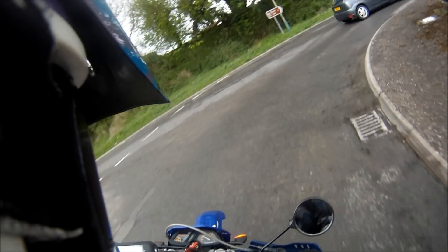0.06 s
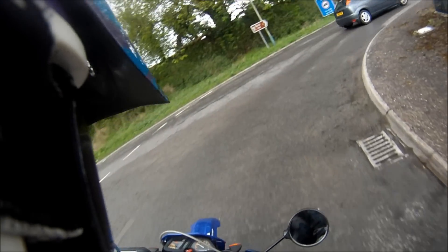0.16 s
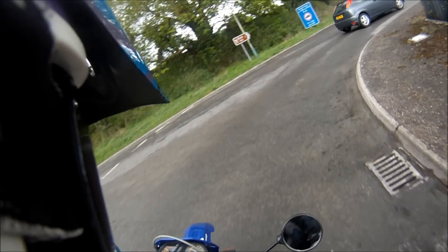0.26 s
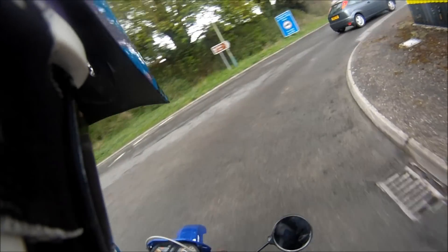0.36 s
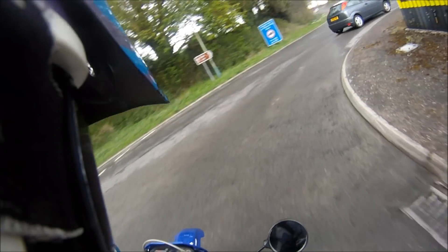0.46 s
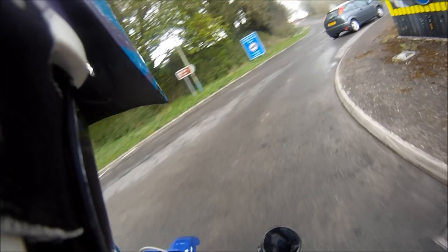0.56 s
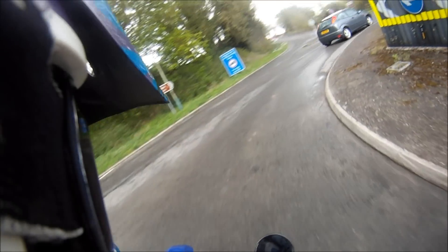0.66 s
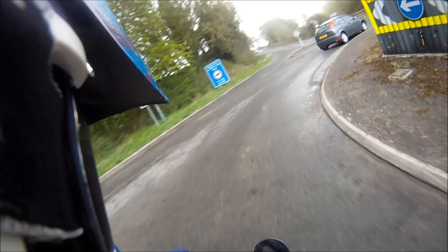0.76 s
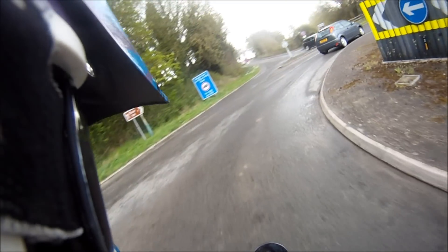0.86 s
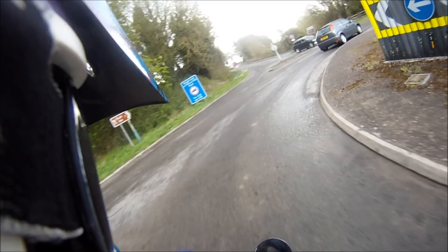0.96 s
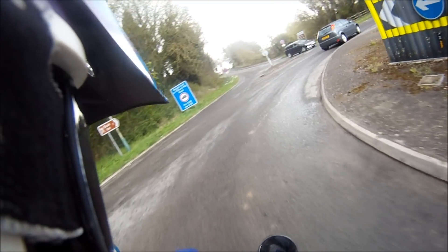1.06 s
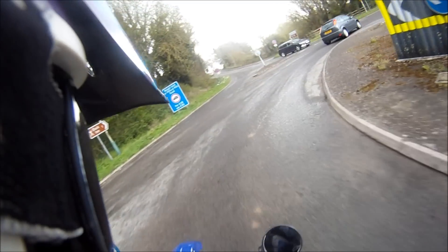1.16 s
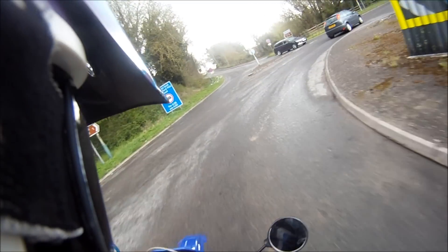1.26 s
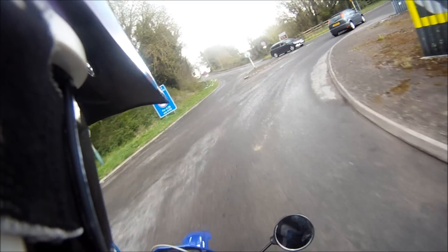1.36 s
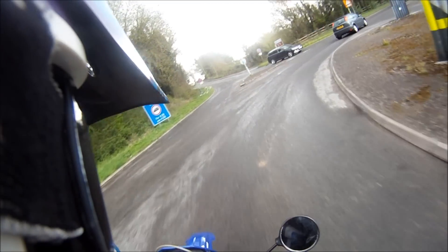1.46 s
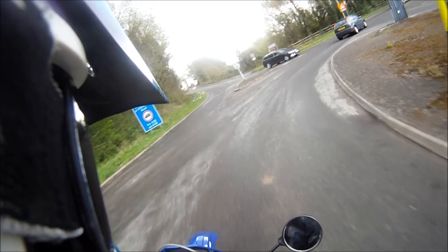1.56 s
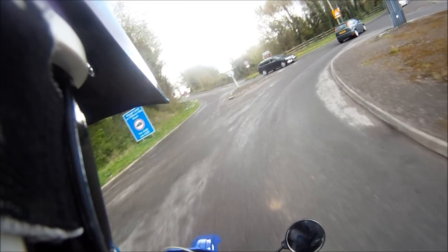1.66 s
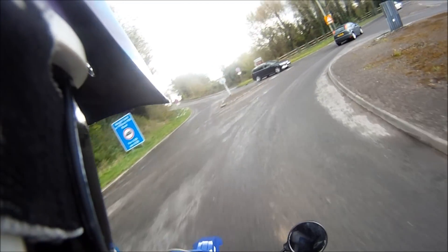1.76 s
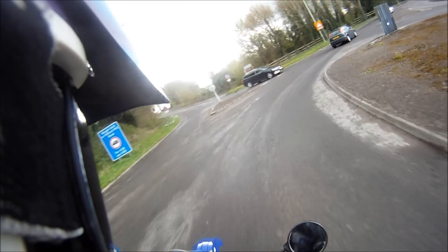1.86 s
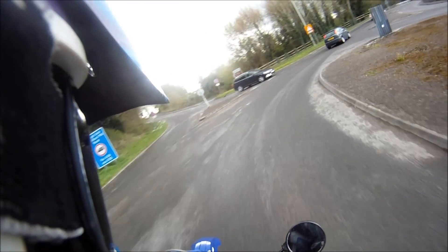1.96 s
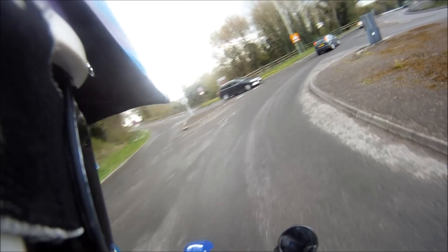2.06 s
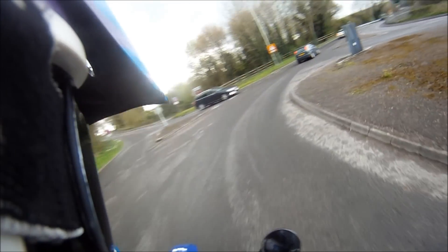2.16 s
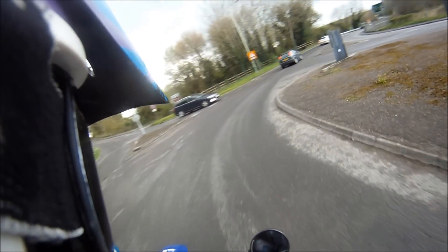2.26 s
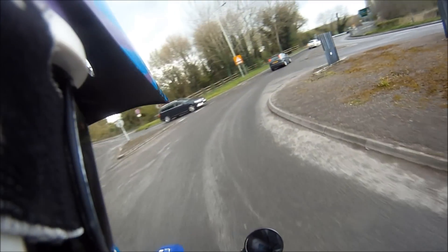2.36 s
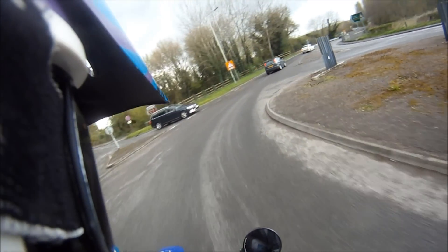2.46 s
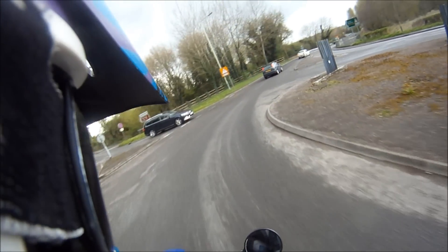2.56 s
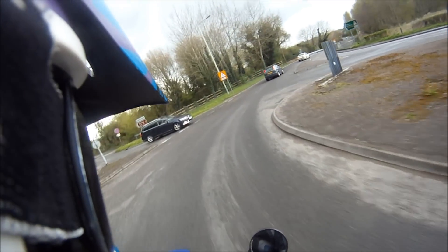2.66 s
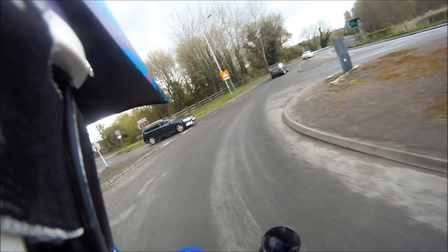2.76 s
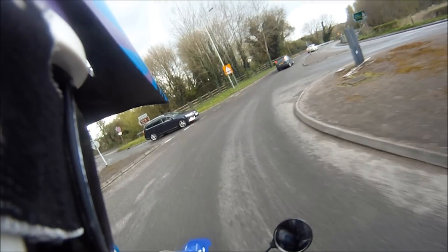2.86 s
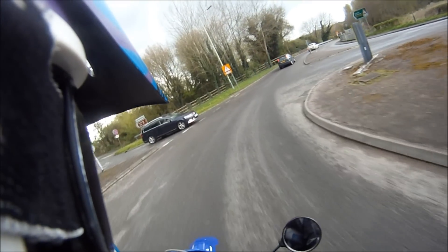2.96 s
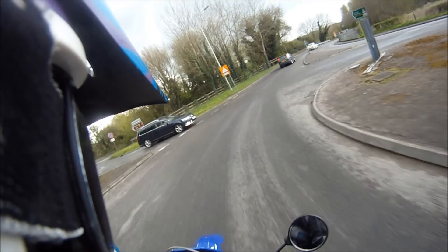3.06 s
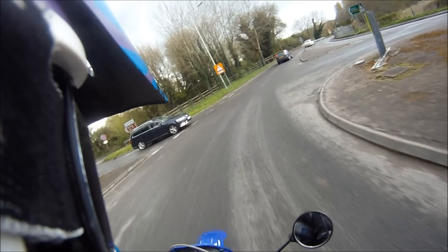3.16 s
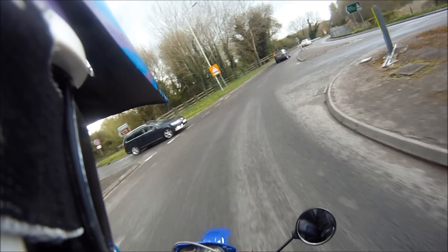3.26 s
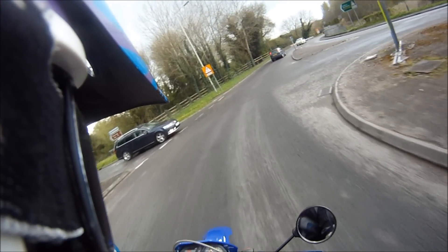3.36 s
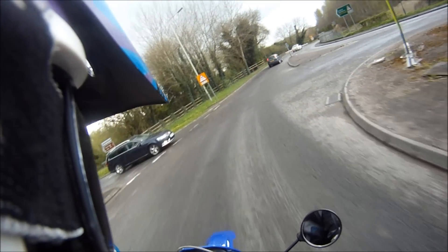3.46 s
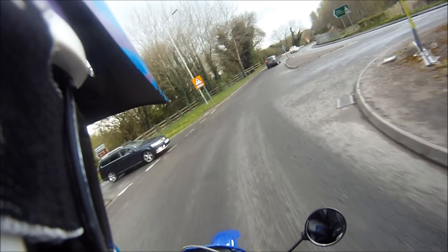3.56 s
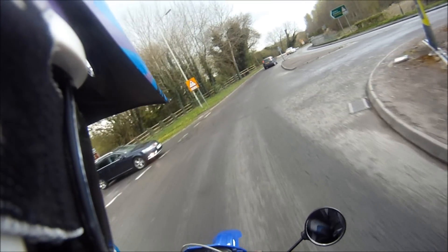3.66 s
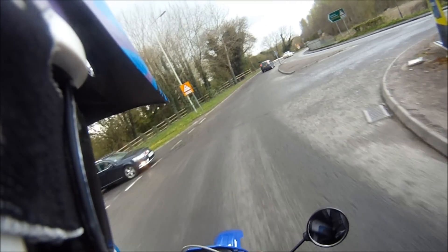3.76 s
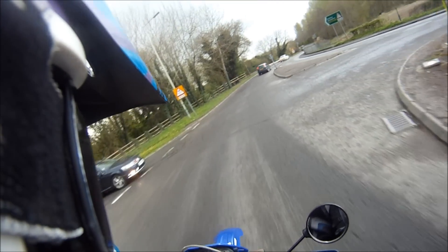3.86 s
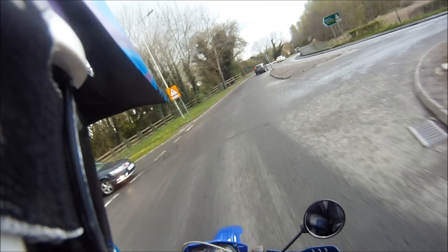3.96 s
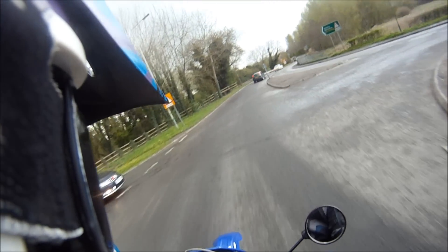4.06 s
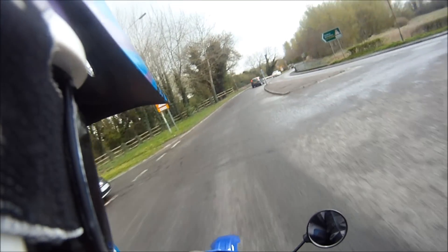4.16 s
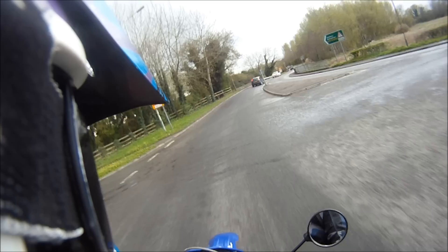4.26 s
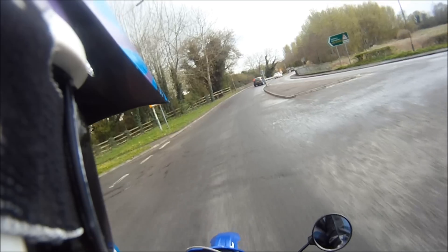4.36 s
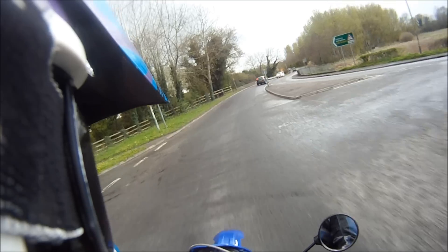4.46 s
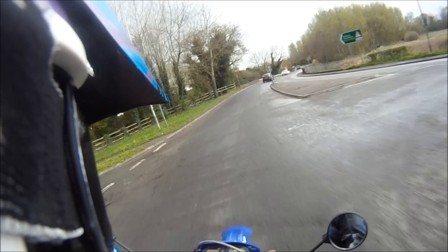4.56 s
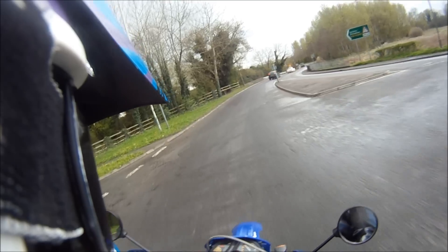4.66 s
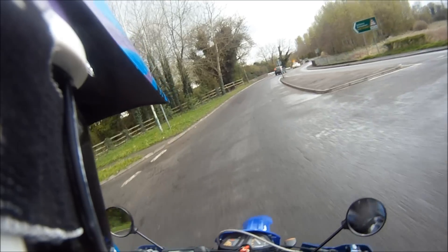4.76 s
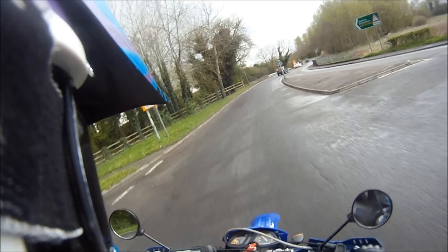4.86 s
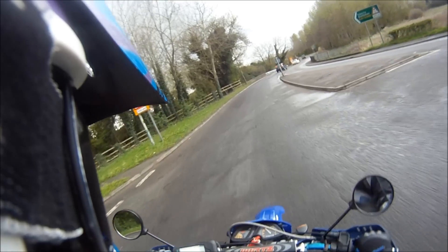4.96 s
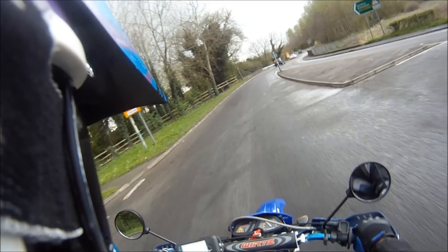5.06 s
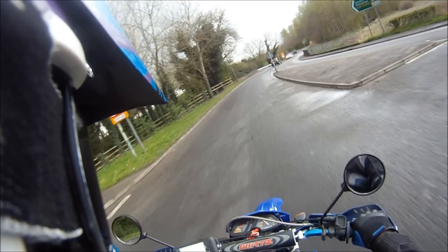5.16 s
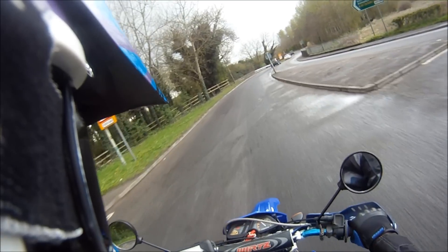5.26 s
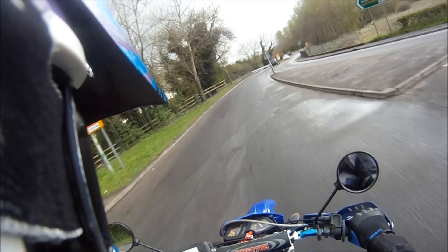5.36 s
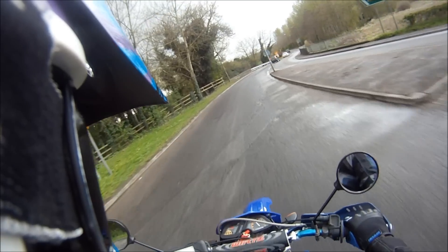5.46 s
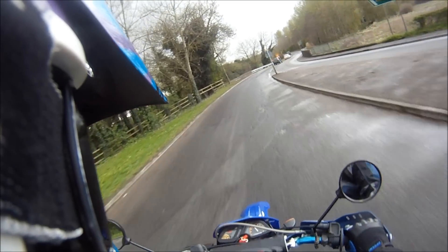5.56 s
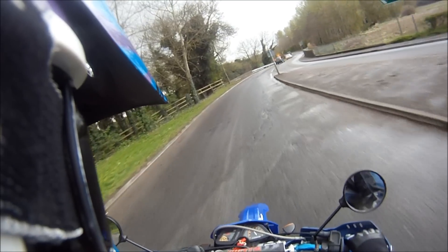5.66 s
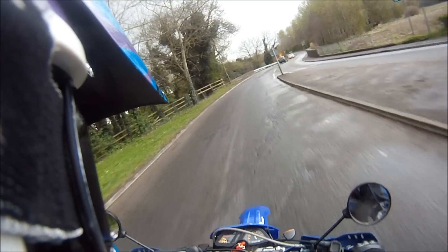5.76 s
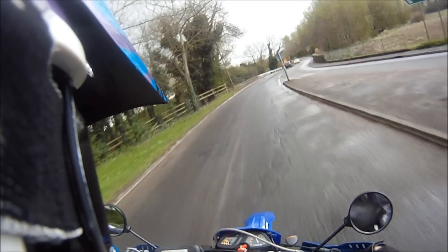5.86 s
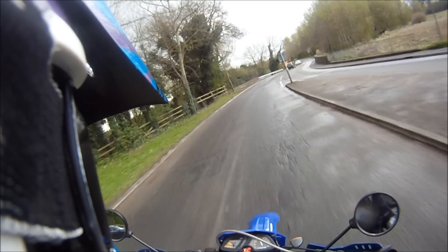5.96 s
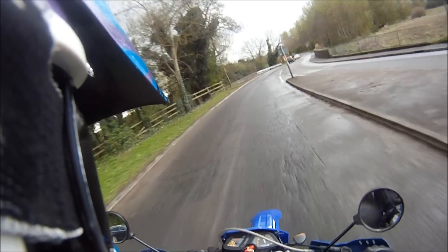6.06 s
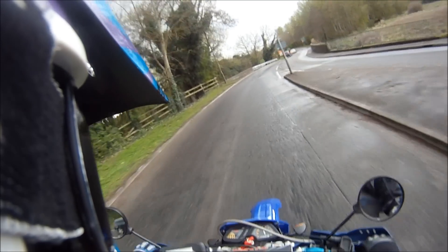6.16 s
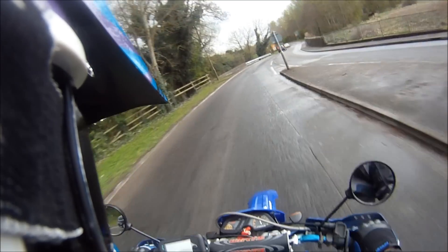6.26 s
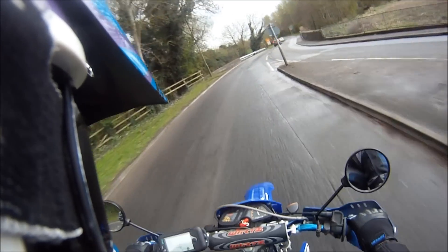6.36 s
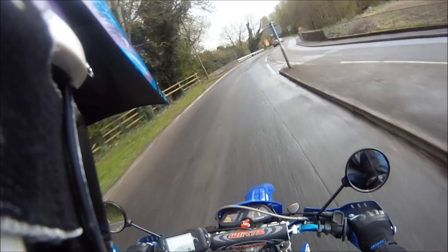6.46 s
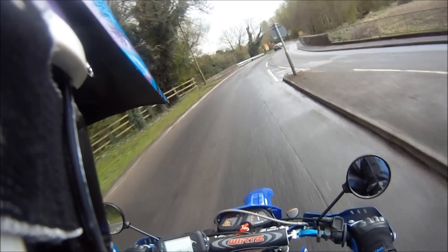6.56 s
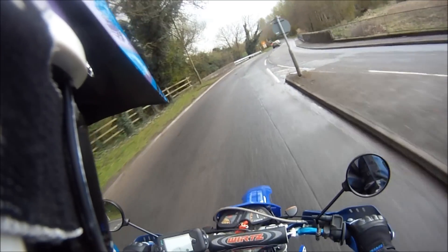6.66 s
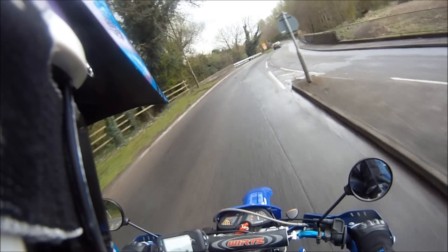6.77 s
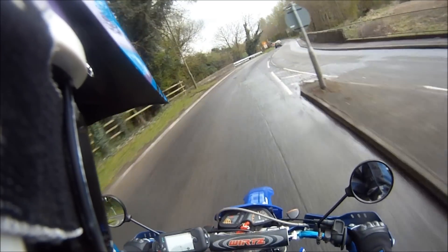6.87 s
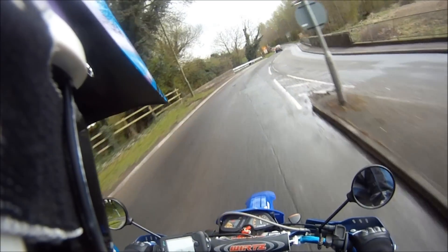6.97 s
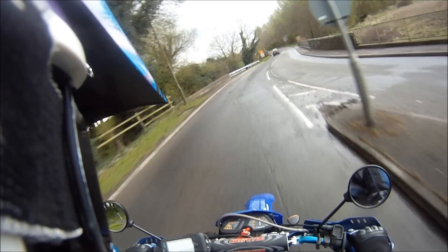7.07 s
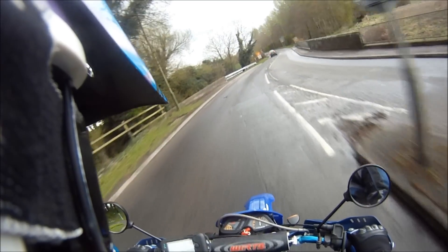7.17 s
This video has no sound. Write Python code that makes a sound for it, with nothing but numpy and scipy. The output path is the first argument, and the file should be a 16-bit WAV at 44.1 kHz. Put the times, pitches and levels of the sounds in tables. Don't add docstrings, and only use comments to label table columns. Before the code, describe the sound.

A small two-stroke motorcycle is heard from a sealed camera on the rider's helmet, close, boxy and gritty, with harsh false treble. From 0 to 2 s the engine holds a hoarse, nasal buzz of about 80 pulses a second, wavering slightly, with deep wind gusts and a thin gear whine. From about 2 s the pitch climbs, roughly 100 by 3.4 s, with small snatches in the drive. A soft thump falls near 4.2 s. After 4.7 s it climbs faster, growing brighter and louder, with a harder jolt at 5.3 s, peaking near 165 at 6 s. The throttle shuts for a quarter second: the buzz weakens, roughens and falls. At about 6.25 s it bites again with a rattle and low thud, juddering around 123, then rises to 140 by the end at about 7.2 s amid stronger wind buffeting.

```python
import sys
import numpy as np
from scipy import signal
from scipy.io import wavfile
from scipy.ndimage import uniform_filter1d

SR = 44100
rng = np.random.default_rng(int(sys.argv[2]) if len(sys.argv) > 2 else 0)


def how_loud(loudness_db):
    steps = np.asarray(loudness_db, float) / 20
    return 10 ** steps


def generate_wav(signal):
    frames = np.transpose(np.atleast_2d(signal))
    scaled = np.clip(frames, -1, 1) * 32767
    pcm = np.round(scaled).astype(np.int16)
    wavfile.write(sys.argv[1], SR, pcm)


N = 318843

SHUT_S, OPEN_S, WRIST_S = 6.005, 6.25, 0.017


def in_time(rows):
    s, *columns = np.transpose(rows)
    return [np.interp(np.arange(N) / SR, s, column) for column in columns]


def by_pitch(points, hz):
    table_hz, level_db = np.transpose(points)
    return np.interp(np.log(hz), np.log(table_hz), level_db)


def between(start_s, end_s, ramp_s):
    t = np.arange(N) / SR
    return np.clip(np.minimum(t - start_s, end_s - t) / ramp_s + .5, 0, 1)


def humps(rows):
    t = np.arange(0, N + 64, 64) / SR
    total = sum(height * np.exp(-((t - s) / length_s) ** 2) for s, length_s, height in rows)
    return np.interp(np.arange(N) / SR, t, total)


def drift(rate_hz):
    step = 40
    r = np.exp(-2 * step * np.pi * rate_hz / SR)
    slow = signal.lfilter([1], [1, -2 * r, r * r], rng.standard_normal(N // step + 2002))[2000:]
    return np.interp(np.arange(N) / step, np.arange(len(slow)), slow / slow.std())


def evened(x, window_s):
    window = int(window_s * SR)
    power = uniform_filter1d(uniform_filter1d(x ** 2, window), window)
    return x / np.sqrt(np.maximum(power, 0) + 1e-20)


def band(x, low_hz, high_hz, order=2):
    return signal.sosfilt(signal.butter(order, [low_hz, high_hz], "band", fs=SR, output="sos"), x)


def resonance(x, hz, width_hz):
    r = np.exp(-np.pi * width_hz / SR)
    top = (1 - r * r) / 2
    return signal.lfilter([top, 0, -top], [1, -2 * r * np.cos(2 * np.pi * hz / SR), r * r], x)


def clicks(at, size):
    at = np.clip(at, 0, N - 2)
    whole = at.astype(int)
    part = at - whole
    return np.bincount(whole, size * (1 - part), N) + np.bincount(whole + 1, size * part, N)


# time_s, speed_hz (turns per second)
SPEED = [(0, 80.07), (.6, 78.81), (1.02, 80.12), (1.19, 83.21), (1.95, 83.26), (2.78, 92.5), (3.2, 98.45),
         (3.6, 102.9), (4.19, 107.5), (4.65, 112.8), (5.11, 127.2), (5.4, 141), (5.84, 157), (6.01, 164.9),
         (6.21, 151.1), (6.27, 122.5), (6.6, 126.3), (7.23, 140.2)]
# time_s, swing_of_revs_hz, level_change_db
SNATCHES = [(.2, -.8, 0.1), (.42, 1.04, 0.1), (.51, -1.1, 0.1), (.78, .9, 0.1), (.93, .9, 0.1),
            (1.16, .3, .8), (1.25, -1.1, 0.1), (0.639, -1.5, 0.1), (1.329, -2, 1), (1.43, -1.85, 1.3),
            (1.629, -1.5, 1), (3.24, 1.82, -1), (3.44, -1.12, -0.3), (3.56, 1.22, -0.8), (3.76, -2, 0.5),
            (3.99, 1.5, 2), (4.06, -2, -1), (4.15, 1.48, 0), (4.43, 1.3, 0.7), (4.66, -0.3, -1),
            (4.73, 1.2, 1), (4.93, 0.7, -0.5), (5.23, 0.24, 1.5), (5.31, 0.42, -1.5), (5.54, -2, 0.5),
            (5.6, 1.22, -2), (5.95, -1.84, -1), (6.32, 0.14, -1), (6.82, .2, 1), (7.1, 0.5, -0.5)]
SNATCH_S = .035


def crank():
    since = np.maximum(np.arange(N) / SR - OPEN_S, 0)
    judder = -3.3 * np.exp(-since / .16) * np.sin(2 * np.pi * 11.5 * since)
    hunting = .3 * drift(8.03) * between(-1, 1.7, 0.32)
    snatches = humps([(s, SNATCH_S, swing_hz) for s, swing_hz, _ in SNATCHES])
    return in_time(SPEED)[0] + hunting + judder + snatches


# time_s, bend (0-1), straightening_up (0-1)
RIDING = [(0, 0.74, 0), (1.05, 0.56, 0.24), (1.2, .3, 0.44), (2.1, 0.34, 0.27), (2.5, 0, 1),
          (3.2, 0.25, 0.97), (4.1, 0, 0.43), (5.1, 0, 0.01), (5.5, 0.2, 0.6), (5.96, 0.1, 0.01),
          (7.23, 0.02, 0.01)]
# start_s, end_s, extra_roughness_db
UNEVEN = [
    (-1, 2.2, 1.5),
    (3.2, 3.95, 3),
    (4.3, 5.99, 1.2),
    (5.99, 6.27, 11),
    (6.27, 8, 3.3),
]


def engine_part(turns, modes, low_hz, high_hz, wander_db, hiss_db):
    timing_jitter_s, strength_jitter_db = 11.11e-6, 1.1
    slap_turn, slap_db, slap_db_per_octave = .31, -18, 5.5
    firing = np.arange(int(turns[-1]))
    fired = np.interp(firing, turns, np.arange(N))
    slapped = np.interp(firing + slap_turn, turns, np.arange(N))
    cycle = fired.astype(int)
    bend, straighten = [column[cycle] for column in in_time(RIDING)]
    uneven = how_loud(sum(db * between(start_s, end_s, 0.066) for start_s, end_s, db in UNEVEN))
    hiss = rng.standard_normal(N) * (1 + 0.4 * np.cos(2 * np.pi * (turns - .33)))
    ring, breath = 0, 0
    for hz, width_hz, level_db, loudest_ms, bend_db, straighten_db in modes:
        build_up_s = 1 / (np.pi * width_hz)
        time_jitter, strength_jitter = uneven[cycle] * rng.standard_normal((2, len(fired)))
        late = (loudest_ms / 1000 - build_up_s + time_jitter * timing_jitter_s) * SR
        wander = wander_db * drift(4.3)[cycle] + strength_jitter_db * strength_jitter
        strength_db = level_db + bend_db * bend + straighten_db * straighten + wander
        slap_strength_db = strength_db + slap_db + slap_db_per_octave * np.log2(hz / 1000)
        blows = clicks(fired + late, how_loud(strength_db)) - clicks(slapped + late, how_loud(slap_strength_db))
        struck = resonance(blows, hz, width_hz)
        ring = ring + resonance(struck, hz, width_hz)
        breath = breath + how_loud(level_db) * resonance(hiss, hz, 3.6 * width_hz)
    both = evened(ring, 0.21) + how_loud(hiss_db) * uneven * breath / breath.std()
    return evened(band(both, low_hz, high_hz), 0.072)


# pitch_hz, width_hz, level_db, loudest_after_firing_ms, gain_in_bend_db, gain_straightening_db
PIPE = [(317, 210, -12.5, 4.18, 15, -1), (393, 108.7, -2.5, 4.35, 3.5, 5),
        (492.5, 81.4, 0, 4.49, -3.5, 0.5), (579, 100.4, -3.5, 4.116, 4, 6.5),
        (637, 91, -1.5, 4.81, -0.5, 4.5), (787.7, 111.8, 2, 4.06, 4.5, 3.5), (862, 76.3, 0, 4.575, -16, 5)]


def exhaust_pipe(turns):
    return engine_part(turns, PIPE, low_hz=300, high_hz=950, wander_db=1.2, hiss_db=-18)


# pitch_hz, width_hz, level_db, loudest_after_firing_ms, gain_in_bend_db, gain_straightening_db
AIR_BOX = [(1080.7, 93.6, -10.5, 5.95, 17, 17), (1187, 56, 8, 6.18, -8, -7.5),
           (1247.5, 86.6, -7, 6.9, 10, 5.5), (1421, 161.8, -9.5, 6.576, 7.5, 1.5),
           (1556, 140.7, -14, 4.3, 9, 4), (1640, 119.9, -17, 3.3, 9, 5)]


def air_box(turns):
    return engine_part(turns, AIR_BOX, low_hz=950, high_hz=1700, wander_db=1.2, hiss_db=-13)


# pitch_hz, width_hz, level_db, loudest_after_firing_ms, gain_in_bend_db, gain_straightening_db
SHELL = [(1736, 107, -5, 5.4, 1, 2.5), (1833.2, 45, -1.5, 6, 8.5, 5.5), (1881, 117.7, 0, 5.6, -1, -7.5),
         (1985, 108.4, 3, 5.7, -5.5, 0.5), (2100, 146.6, -4.5, 6.1, -2.5, 4),
         (2300, 129.3, -4, 6.2, 3, 5.7)]


def shell(turns):
    return engine_part(turns, SHELL, low_hz=1600, high_hz=2400, wander_db=2, hiss_db=-12)


# pitch_hz, width_hz, level_db, loudest_after_firing_ms, gain_in_bend_db, gain_straightening_db
FINS = [(2402, 160.8, -2, 6.2, 4, -2), (2578, 81, -2.5, 6.1, 12, 4), (2700, 109.5, 0.5, 3.1, -11.5, 2),
        (2900, 137.2, -5.5, 2.418, -6.5, -1.5), (3315, 153.7, -9.5, 5.4, -6.5, 3.5),
        (3558, 130, -7.5, 5.6, 0.5, 1), (3770, 175, -9.5, 5.1, 0, -9), (4053, 201.4, -17, 2.3, 1, 3),
        (4550, 200, -17.5, 4.6, 2, 2.5), (4874, 274.7, -12.5, 6.4, 0, -1.5),
        (5490, 512, -13.5, 4.4, 4, -0.5)]


def cooling_fins(turns):
    return engine_part(turns, FINS, low_hz=2300, high_hz=5900, wander_db=2, hiss_db=-7)


# time_s, effort_db
EFFORT = [(0, -11.5), (1.07, -10.5), (1.15, -10), (2, -12), (2.6, -9), (3.4, -9.5), (3.75, -10),
          (4.2, -7.5), (4.65, -7.5), (4.9, -7), (5.05, -4), (5.45, 0.2), (5.65, -1.5), (5.97, -0.3),
          (6.3, -2.5), (6.75, -2.2), (7.23, 1.2)]
# full_effort_level_db, share_of_effort, shut_throttle_change_db, gain_in_bend_db
ANSWERS = [
    (-40.5, 0.2, -5.5, -5.5),
    (-31.5, 0.51, -4.5, -13.5),
    (-25, 1.093, -7.5, 2),
    (-26.5, 1.09, -9.5, -0.4),
]
# pitch_hz, width_hz, swell_db
SHARPEST = [
    (792, 65, 3),
    (1189.7, 50.4, 7.5),
    (1879, 79, 3.5),
    (2716, 68, 1),
]


def part_levels(revs):
    snatch_shares, rattle_db = [0.26, 1.54, 1.06, 0.47], [.5, .5, 1.5, 9]
    effort, bend = in_time(EFFORT)[0], in_time(RIDING)[0]
    snatch = humps([(s, SNATCH_S, db) for s, _, db in SNATCHES])
    shut = between(SHUT_S, OPEN_S, WRIST_S)
    steady = 1 - between(SHUT_S, OPEN_S + .13, .05)
    rattle = humps([(6.205, .022, 1)])
    levels = []
    for k, (full_db, share, shut_db, bend_db) in enumerate(ANSWERS):
        hz, width_hz, swell_db = SHARPEST[k]
        miss_hz = hz - revs * np.round(hz / revs)
        swell = steady / (1 + (2 * miss_hz / width_hz) ** 2) + .3 * (1 - steady)
        riding_db = full_db + share * effort + shut_db * shut + bend_db * bend
        jolt_db = snatch_shares[k] * snatch + rattle_db[k] * rattle
        levels.append(riding_db + jolt_db + swell_db * swell)
    return levels


# time_s, cancelled_order (multiple of the revs), share (0-1)
RETURN_WAVE = [(2.9, 7.1, .05), (3.25, 7.1, .45), (4.1, 5.4, .2), (4.5, 5.1, .6), (4.95, 6.1, .65),
               (5.3, 6.1, .55), (5.65, 6.1, .1), (6.3, 6.1, .6), (7.23, 6.1, .3)]


def with_return_wave(pipe, revs):
    order, share = in_time(RETURN_WAVE)
    share = np.clip(share, 0, 1)
    late = 1.5 * SR / (order * revs)
    returned = np.interp(np.arange(N) - late, np.arange(N), pipe)
    return (pipe + share * returned) / np.sqrt(1 + share ** 2)


# pitch_hz, level_db
ORDERS_HEARD = [
    [(79, -61.5), (84, -52.5), (97, -46.5), (110, -50.5), (126, -42.5), (140, -42), (158, -43.5),
     (165, -41)],
    [(160, -62), (168, -63.5), (192, -47), (220, -44), (250, -39), (284, -43), (300, -51), (330, -39)],
    [(240, -63.5), (252, -68.5), (303, -54), (327, -91), (378, -38.5), (405, -38), (450, -63), (480, -50)],
]


def exhaust_thump(revs, turns):
    thump = 0
    for k, heard in enumerate(ORDERS_HEARD):
        order = k + 1
        level_db = by_pitch(heard, order * revs) + 1.08 * drift(10.0)
        thump = thump + how_loud(level_db) * np.sqrt(2) * np.sin(2 * np.pi * order * turns + k)
    return thump


def engine(revs, turns):
    pipe_db, box_db, shell_db, fins_db = part_levels(revs)
    pipe = with_return_wave(how_loud(pipe_db) * exhaust_pipe(turns), revs)
    box = how_loud(box_db) * air_box(turns)
    walls = how_loud(shell_db) * shell(turns)
    fins = how_loud(fins_db) * cooling_fins(turns)
    return pipe + box + walls + fins + exhaust_thump(revs, turns)


# pitch_hz, level_db
MESH = [(1780, -46), (1802, -28.5), (1840, -31.5), (1885, -43), (2140, -39), (2400, -46), (2690, -32.5),
        (3100, -41)]
# pitch_hz, level_db
MESH_OCTAVE = [(3500, -51.5), (3700, -56), (4050, -62), (4600, -55.5), (5400, -53), (6500, -62)]


def gear_mesh(revs, turns):
    teeth, shut_db, high_gear_db = 22, -16, -6
    angle = 2 * np.pi * teeth * turns + .15 * drift(9)
    load_db = shut_db * between(SHUT_S, OPEN_S, WRIST_S) + high_gear_db * between(OPEN_S, 9, WRIST_S)
    mesh_db = load_db + by_pitch(MESH, teeth * revs) + 1.5 * drift(9)
    octave_db = load_db + by_pitch(MESH_OCTAVE, 2 * teeth * revs) + 2.9 * drift(14)
    return np.sqrt(2) * (how_loud(mesh_db) * np.sin(angle) + how_loud(octave_db) * np.sin(2 * angle))


# time_s, pitch_hz, level_db
GEAR_WHINE = [
    (5.45, 242.5, -61),
    (5.7, 262.3, -50),
    (5.95, 279, -53),
]


def gear_whine():
    hz, level_db = in_time(GEAR_WHINE)
    start, end = GEAR_WHINE[0][0], GEAR_WHINE[-1][0]
    on = np.interp(np.arange(N) / SR, [start - .08, start, end, end + .04], [0, 1, 1, 0])
    return on * how_loud(level_db) * np.sqrt(2) * np.sin(2 * np.pi * np.cumsum(hz) / SR)


# start_s, peak_db, pitch_hz
BUMPS = [
    (0.749, -41, 59.4),
    (4.15, -37, 69.6),
    (5.301, -26, 110),
    (6.01, -37, 60),
    (6.3, -25, 69),
]


def bumps():
    out = np.zeros(N)
    age = np.arange(int(.06 * SR)) / SR
    for s, peak_db, hz in BUMPS:
        swell = np.sin(np.pi * np.minimum(age * hz / 1.7, 1)) ** 2
        start = int(s * SR)
        out[start:start + len(age)] += how_loud(peak_db) * np.sin(2 * np.pi * hz * age) * swell
    return out


# middle_s, length_s, buffet_gain_db
GUSTS = [(.1, 0.15, 11), (.4, 0.14, 11.5), (.73, 0.095, 12.5), (1.05, .08, 10.5), (1.35, 0.13, 9),
         (1.65, 0.13, 9), (1.93, .07, 11), (2.1, .05, 9), (2.35, .15, 9), (2.68, .06, 7), (2.97, .1, 6),
         (3.38, 0.05, 9.5), (3.65, 0.063, 7), (4.15, .25, 2.5), (4.48, .05, 6), (4.62, 0.046, 8),
         (4.78, .05, 7.5), (5.05, .05, 10), (5.33, .1, 6.5), (6.18, .04, 6), (6.36, .1, 12.5),
         (6.6, 0.17, 12), (6.92, 0.094, 8.5), (7.23, 0.097, 13)]


def wind(revs):
    gear_step = 1.22
    road_speed = revs * (1 + (gear_step - 1) * between(OPEN_S, 9, .05))
    road = np.log2(uniform_filter1d(road_speed, SR // 5) / 80)
    buffet_db = -49.5 + 7 * road + humps(GUSTS)
    skirt_db = buffet_db - 15.5 + 1.7 * drift(8.1)
    rush_db = -54.5 + 11.5 * road + 0.81 * drift(4.2) + 0.62 * drift(16)
    white = rng.standard_normal((3, N))
    buffet = evened(band(white[0], 22.3, 39.4), 0.12) * how_loud(buffet_db)
    skirt = evened(band(white[1], 39, 110), 0.37) * how_loud(skirt_db)
    rush = evened(band(white[2], 71, 600, order=1), .3) * how_loud(rush_db)
    return buffet + skirt + rush


def scene():
    revs = crank()
    turns = np.cumsum(revs) / SR
    return (engine(revs, turns) + gear_mesh(revs, turns) + gear_whine() + bumps() + wind(revs))[None]


def band_limit(x):
    return signal.sosfilt(signal.butter(12, 15720, fs=SR, output="sos"), x)


def record(dry):
    up, down, hold = 40, 147, 4
    rounded = .45 * np.tanh(dry / .45)
    guarded = signal.sosfilt(signal.butter(8, 5750, fs=SR, output="sos"), rounded)
    slow = signal.resample_poly(guarded, up, down, axis=1)
    held = np.repeat(slow, hold, axis=1)
    mix = signal.resample_poly(held, down, up * hold, axis=1)[:, :N]
    mix = signal.sosfilt(signal.ellip(10, .2, 70, 15280, fs=SR, output="sos"), mix)
    return band_limit(mix)


dry = scene()
out = record(dry)
generate_wav(out)
```